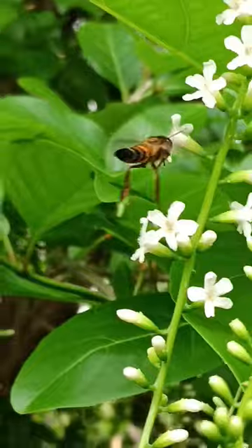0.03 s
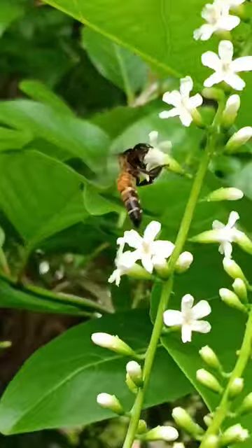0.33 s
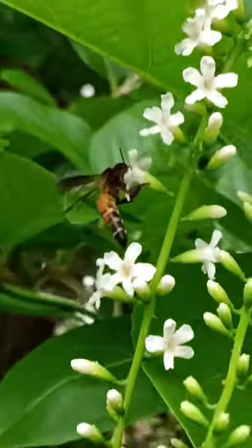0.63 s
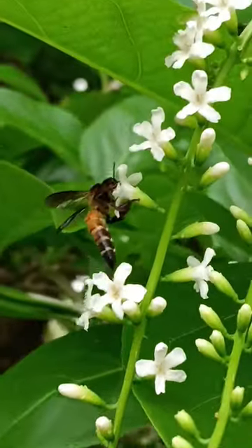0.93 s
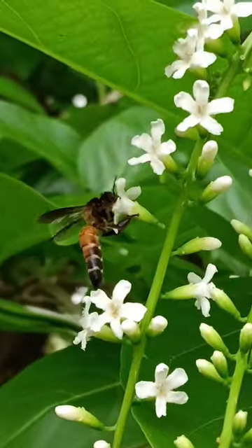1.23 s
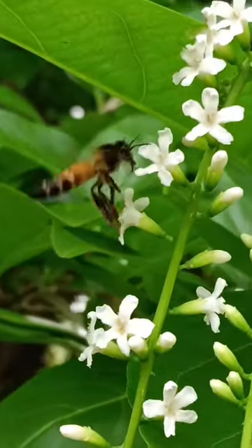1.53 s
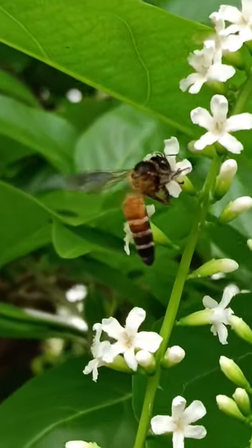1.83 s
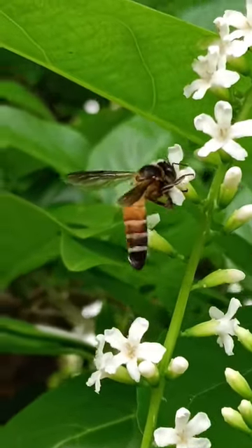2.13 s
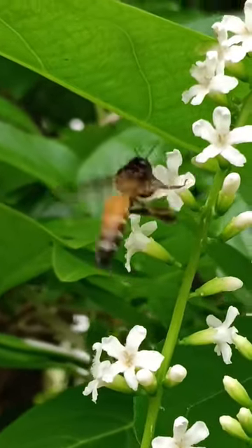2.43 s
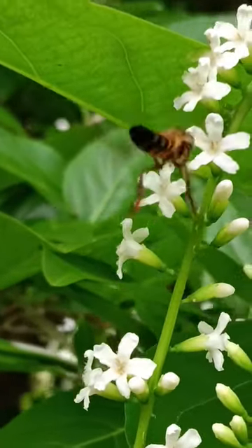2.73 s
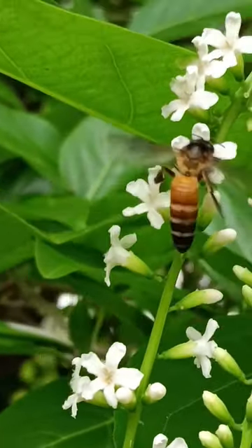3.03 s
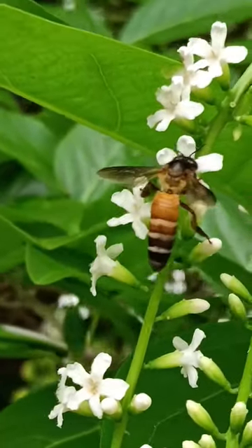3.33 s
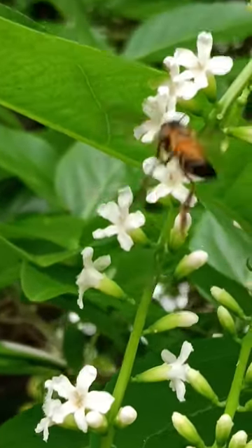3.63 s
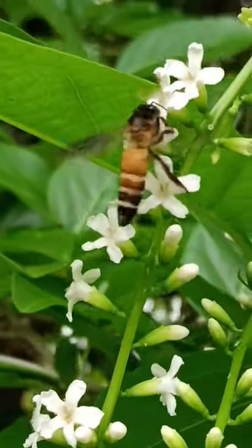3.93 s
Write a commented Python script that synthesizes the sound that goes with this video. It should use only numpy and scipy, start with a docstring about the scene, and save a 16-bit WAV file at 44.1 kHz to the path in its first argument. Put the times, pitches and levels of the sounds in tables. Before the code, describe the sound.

A low, steady rumble of far traffic and light hiss fill a garden. Two sharp clicks and small finger ticks sound close to the hand-held microphone, while a bee's faint hum comes and goes in the second half.

```python
"""Thin hiss opens out of a quarter second of near silence, with the low, steady rumble of far traffic
close behind: a garden. Faint, brief swells lift the background; fingers tick and rub on a hand-held camera.
Twice its case snaps sharply and rings, mostly at the left microphone.
A large bee flies between flowers, its wingbeats a faint hum that swells with each short flight."""
import sys
import numpy as np
from scipy import signal
from scipy.fft import rfft, irfft, next_fast_len
from scipy.io import wavfile
from scipy.ndimage import uniform_filter1d, map_coordinates

SR = 44100
rng = np.random.default_rng(int(sys.argv[2]) if len(sys.argv) > 2 else 0)


def generate_wav(sig):
    """Save sig (samples, or channels by samples) to the path in sys.argv[1] as 16-bit PCM at SR."""
    pcm = np.round(np.clip(np.atleast_2d(sig).T, -1, 1) * 32767).astype(np.int16)
    wavfile.write(sys.argv[1], SR, pcm)


N = 176400

# Fade-ins of the hiss and of everything else: time_s, gain_db
HISS_FADE_IN = [(.165, -53), (.195, -16), (.25, -8), (.3, -5.5)]
GARDEN_FADE_IN = [(.18, -60.5), (.243, -28), (.26, -8), (.31, -5)]
# Hiss colour at each microphone: freq_hz, relative_db
HISS_LEFT_EQ = [(500, -38), (1500, 2.5), (2300, -4.5), (4400, -1), (5000, -4), (5500, -2.5), (6550, -14.5),
                (7050, -6), (7400, 3.5), (7750, 1), (8200, -2.5), (9100, -8.5), (9400, -18.5), (10200, -10),
                (11500, -45), (15200, -42)]
HISS_RIGHT_EQ = [(500, 1.5), (1500, -9), (2400, -1), (4700, -3), (5400, -0.5), (6550, -12.5), (7300, -4),
                 (7750, 1.5), (8200, -11), (9000, -9.5), (9450, -23.5), (9950, 1), (10400, -2),
                 (11000, -8.5), (11500, -54.5), (15000, -25.5)]
# Fader ride of the traffic's roar: time_s, level_db
ROAR_RIDE = [(.3, -47), (.8, -46), (1.25, -47.5), (1.45, -45.5), (1.62, -47), (1.72, -45), (1.95, -46),
             (2.55, -47), (2.66, -47), (2.8, -50), (3.05, -49), (3.3, -48), (3.55, -48.5), (3.82, -46),
             (4, -47.5)]
# Colours of the traffic's roar and of the rumble under it: freq_hz, relative_db
ROAR_EQ = [(60, -20.5), (130, -21.5), (200, -2), (280, -1.5), (400, -4), (500, -4.5), (600, -9), (800, -9),
           (950, -9.5), (1080, -8), (1220, -10.5), (1310, -26.5), (1650, -22.5), (2100, -32.5),
           (3500, -45.5)]
RUMBLE_EQ = [(20, -31.5), (32, -35), (48, -10.5), (65, -9), (90, -2.5), (125, -1.5), (170, -8.5),
             (300, -16.5), (800, -79.5)]
# How alike the traffic is left and right: freq_hz, correlation
STEREO_LIKENESS = [(50, 0.59), (120, 0.635), (270, 0.74), (500, 0.62), (800, 0.372), (1200, 0.195),
                   (2000, 0.0015)]
# Faint, brief swells in the background noise: peak_s, sigma_s, level_db, centre_hz, width_hz
NOISE_SWELLS = [(0.328, 0.0093, -48, 770, 500), (0.617, 0.0135, -47.5, 1013, 500),
                (0.436, .005, -50, 800, 500), (0.889, 0.004, -42, 700, 587), (0.918, 0.009, -41.5, 100, 70),
                (0.939, 0.0142, -57, 1750, 500), (1.039, 0.026, -51.5, 120.5, 50),
                (1.062, 0.0383, -47.5, 1075, 286), (1.094, 0.094, -56, 1880, 650),
                (2.293, 0.0474, -49.5, 97, 50), (2.363, 0.0132, -60.5, 2550, 1200)]
# Finger ticks and rubs: start_s, level_db, rise_s, t60_s, ring_hz, ring_relative_db
FINGER_TOUCHES = [(.364, -59.5, 0.0068, 0.52, 3970, -3.5), (.621, -54.5, 0.00102, 0.036, 7850, 4),
                  (.692, -47.5, 0.00076, 0.0332, 10120, -10.5), (1.162, -47, .001, 0.061, 1880, 13),
                  (1.315, -48.5, .002, 0.179, 7254, 0), (1.53, -40.5, .0007, .06, 8900, -6),
                  (1.543, -41, 0.0022, 0.166, 4350, -7), (1.613, -34, 0.00205, 0.0306, 3040, 1),
                  (1.632, -47, 0.0021, 0.09, 3090, -14), (1.721, -51.5, .0017, 0.095, 5424, -8.5),
                  (1.77, -56, 0.0048, 0.136, 4250, -3), (3.097, -38, 0.00154, 0.0195, 2631, -4.5),
                  (3.2194, -41, 0.00094, 0.026, 5492, 0), (3.276, -50.5, 0.0024, 0.097, 7874, 4.5),
                  (3.325, -49.5, 0.00214, 0.066, 4713, 3), (3.543, -46.5, 0.00166, 0.073, 3400, -6)]
# Colour of the case under a finger: freq_hz, relative_db
SCRAPE_EQ = [(600, -9.5), (2000, -8), (3200, -9), (4300, -3.5), (4900, -9), (5600, -2.5), (6500, -20),
             (7500, 6), (8200, -5.5), (8900, -11), (9500, -19), (10200, -5.5), (11300, -30.5), (15000, -34)]
# Colours of the two loud clicks: freq_hz, relative_db
DULL = [(300, -41), (1100, -6), (1400, -16), (1750, -1), (2400, -10.5), (3400, 0), (4500, -7), (5400, -6),
        (6500, -27), (7350, -0.5), (7800, -8.5), (8300, -18.5), (9400, -37), (10150, -9), (11500, -41),
        (15000, -51.5)]
BRIGHT = [(300, -11), (1450, -23.5), (2150, -5), (2600, -10), (3000, -12.5), (3500, -15.5), (4150, -6.5),
          (4900, -13), (5750, -7.5), (6400, -24.5), (7000, -12), (7780, 2), (8200, -6.5), (8800, -1.5),
          (9600, -16.5), (10300, -11), (11200, -12), (15300, -10.5)]
# Loud clicks: start_s, level_db, snap_t60_s, tail_relative_db, tail_t60_s, ring_relative_db, colour
CASE_CLICKS = [(1.0703, -22.5, 0.0079, -16, 0.32, -16, DULL),
               (3.0546, -18, 0.033, -13.5, 0.163, -12, BRIGHT)]
# Ringing modes of the case: pitch_hz, relative_db, t60_s
CASE_MODES = [(1740.3, -6, 0.149), (2230, 7, 0.0234), (2595, -5, .16), (3372, -6.5, 0.29), (4196, 0, 0.059),
              (4620, -3, .42), (5785, -1.5, 0.081), (7484, -14.5, 0.408), (7920, 3.5, 0.061)]
# The bee's flights: peak_s, sigma_s, wingbeat_hz, fundamental_left_db, octave_db
BEE_FLIGHTS = [(1.702, 0.046, 120, -57, -50), (2.674, 0.054, 122.1, -59.5, -44.5),
               (2.917, 0.087, 128, -59, -46.5), (3.103, 0.099, 126, -52, -52.5),
               (3.725, 0.041, 121.7, -52, -59.5), (3.855, 0.093, 127.5, -62.5, -46),
               (3.974, 0.091, 124.8, -53, -61.5)]

TAIL_RIGHT_DB = -4  # the case's diffuse sound sits a little to the left


def amp(db):
    """Decibels to gain."""
    return 10 ** (np.asarray(db) / 20)


def unit(x):
    """Scale to rms 1."""
    return x / np.sqrt(np.mean(x ** 2) + 1e-20)


def along(points, hz):
    """Read a curve of (freq_hz, value) points on a log frequency axis."""
    freqs, values = np.transpose(points)
    return np.interp(np.log(hz + 1), np.log(freqs + 1), values)


def fader(points):
    """A gain curve through (time_s, gain_db) points."""
    return amp(np.interp(np.arange(N) / SR, *np.transpose(points)))


def swell(peak_s, sigma_s):
    """A bell-shaped rise and fall."""
    return np.exp(-.5 * ((np.arange(N) / SR - peak_s) / sigma_s) ** 2)


def strike(t, rise_s, t60_s):
    """A straight attack, then an exponential decay."""
    return np.minimum(t / rise_s, 1) * amp(-60 * np.maximum(t - rise_s, 0) / t60_s)


def wobble(rate_hz):
    """A smooth random curve with rate_hz knots a second."""
    knots = rng.standard_normal(int(N * rate_hz / SR) + 4)
    return map_coordinates(knots, [np.arange(N) * rate_hz / SR])


def grain(size, depth_db, span):
    """A rough, flickering gain, smoothed over span samples."""
    return amp(depth_db * unit(uniform_filter1d(rng.standard_normal(size), size=span)))


def filtered(x, response):
    """Pass x through a response given as a function of frequency."""
    size = x.shape[-1]
    padded = next_fast_len(size + 4096)
    return irfft(rfft(x, padded) * response(np.fft.rfftfreq(padded, 1 / SR)), padded)[..., :size]


def band(centre_hz, width_hz, size):
    """Stereo noise in one resonance, rms 1."""
    white = rng.standard_normal((2, size))
    return unit(filtered(white, lambda hz: 1 / (1 + (2 * (hz - centre_hz) / width_hz) ** 2)))


def patchy(depth_db):
    """Two unrelated noises with brief, narrow patches of random gain."""
    spectra = signal.stft(rng.standard_normal((2, N)), nperseg=1024)[2]
    patches = uniform_filter1d(rng.standard_normal(spectra.shape[1:]), size=4, axis=0)
    patches = uniform_filter1d(patches, size=4, axis=1)
    gain = amp(depth_db * 2 * np.tanh(unit(patches) / 2))
    return signal.istft(spectra * gain, nperseg=1024)[1][:, :N]


def right(db):
    """Channel gains that trim only the right side."""
    return amp([[0], [db]])


def across(x, right_db, lag_s=0.000507):
    """A sound at the left microphone reaches the right one later and weaker."""
    lags_s = np.array([[0], [lag_s]])
    return filtered(np.array([x, x]), lambda hz: np.exp(-2j * np.pi * hz * lags_s)) * right(right_db)


def add(out, start_s, x):
    """Mix x into out at start_s."""
    part = out[:, round(start_s * SR):][:, :x.shape[1]]
    part += x[:, :part.shape[1]]


def hiss(level_db=-61):
    """Thin, slightly restless hiss, coloured by each microphone's port."""
    ports = filtered(patchy(depth_db=4.5),
                     lambda hz: amp([along(HISS_LEFT_EQ, hz), along(HISS_RIGHT_EQ, hz)]))
    return amp(level_db + 1.34 * wobble(7.9)) * unit(ports)


def outdoor_bed(eq, patchy_db):
    """Outdoor noise of rms 1, fairly centred in the bass and wide in the treble."""
    def mid_side_eq(hz):
        spread = np.arccos(np.clip(along(STEREO_LIKENESS, hz), -1, 1)) / 2
        return amp(along(eq, hz)) * [np.cos(spread), np.sin(spread)]
    mid, side = filtered(patchy(patchy_db), mid_side_eq)
    return unit(np.array([mid + side, mid - side]))


def traffic(rumble_db=-53):
    """Far traffic: a dull, burbling roar over a deeper rumble that leans to the right."""
    roar = fader(ROAR_RIDE) * amp(0.472 * wobble(22.235)) * outdoor_bed(ROAR_EQ, patchy_db=3.5)
    rumble = amp(rumble_db + 1.75 * wobble(9.11)) * outdoor_bed(RUMBLE_EQ, patchy_db=1.5)
    return roar + rumble * right(db=5.0)


def background_swells():
    """The background noise lifts faintly and briefly, one band at a time."""
    return sum(amp(db) * swell(peak_s, sigma_s) * band(centre_hz, width_hz, N)
               for peak_s, sigma_s, db, centre_hz, width_hz in NOISE_SWELLS)


def contact_noise(eq, size, ripple_db=3.5, step_hz=190):
    """Coloured noise of rms 1 with fine resonances that change from contact to contact."""
    ripple = ripple_db * rng.standard_normal(SR // step_hz)
    white = rng.standard_normal((2, size))
    return unit(filtered(white, lambda hz: amp(along(eq, hz) + map_coordinates(ripple, [hz / step_hz]))))


def fingers(crack_db=2.5, crack_t60_s=0.0088, crisp_rise_s=0.00066):
    """Each touch scrapes the case: a grainy burst with one resonance and a faint tail."""
    out, t = np.zeros((2, N)), np.arange(SR // 3) / SR
    for start_s, db, rise_s, t60_s, ring_hz, ring_db in FINGER_TOUCHES:
        rub = contact_noise(SCRAPE_EQ, len(t))
        scrape = unit(rub + amp(ring_db) * band(ring_hz, width_hz=340, size=len(t)))
        tick = scrape[0] * strike(t, rise_s, t60_s) * grain(len(t), depth_db=0.81, span=90)
        crispness = np.exp(-rise_s / crisp_rise_s)  # only sudden touches open with a thin crack
        crack = crispness * amp(crack_db - 60 * t / crack_t60_s) * rng.standard_normal(len(t))
        tail = amp(-12.5) * scrape * strike(t, rise_s=0.0102, t60_s=0.217) * right(TAIL_RIGHT_DB)
        add(out, start_s, amp(db) * (across(tick + crack, right_db=-11.5) + tail))
    return out


def case_mode(hz, size, waver_hz=85):
    """One wavering mode of the case, rms 1, with its own phase at each microphone."""
    cycles = np.cumsum(hz + waver_hz * wobble(rate_hz=260)[:size]) / SR
    return unit(np.sin(2 * np.pi * (cycles + rng.random((2, 1)))))


def clicks(strain_db=-20.5):
    """The case strains briefly, snaps at the left microphone and rings; a diffuse tail reaches both."""
    out, t = np.zeros((2, N)), np.arange(SR // 2) / SR
    for start_s, db, snap_t60_s, tail_db, tail_t60_s, ring_db, colour in CASE_CLICKS:
        snap = contact_noise(colour, len(t))[0] * strike(t, 0.00084, snap_t60_s)
        roughness = grain(len(t), depth_db=2.2, span=160)
        tail = contact_noise(colour, len(t)) * strike(t, 0.0103, tail_t60_s) * roughness
        ring = sum(amp(mode_db + along(colour, hz)) * case_mode(hz, len(t)) * strike(t, 0.00211, t60_s)
                   for hz, mode_db, t60_s in CASE_MODES)
        diffuse = (amp(tail_db) * tail + amp(ring_db) * ring) * right(TAIL_RIGHT_DB)
        add(out, start_s, amp(db) * (across(snap, right_db=-12) + diffuse))
        strain = swell(start_s, sigma_s=0.00335) * contact_noise(colour, N)
        out += amp(db + strain_db) * strain * right(TAIL_RIGHT_DB)
    return out


def bee(pitch_waver=0.01648, flutter_db=1.7, buzz_db=-9):
    """Beating wings give a fluttering fundamental, leaning right, with its octave and a weaker buzz."""
    out = np.zeros((2, N))
    for peak_s, sigma_s, wingbeat_hz, fundamental_db, octave_db in BEE_FLIGHTS:
        phase = 2 * np.pi * np.cumsum(wingbeat_hz * (1 + pitch_waver * wobble(25))) / SR
        fundamental = amp(fundamental_db) * np.sin(phase) * right(db=8.5)
        buzz = np.sin(3 * phase) + np.sin(4 * phase)
        overtones = amp(octave_db) * (np.sin(2 * phase) + amp(buzz_db) * buzz)
        out += swell(peak_s, sigma_s) * amp(flutter_db * wobble(30)) * (fundamental + overtones)
    return out


def scene():
    """The hiss fades in first; the garden and the handling follow just behind."""
    garden = traffic() + bee() + clicks() + fingers() + background_swells()
    return fader(HISS_FADE_IN) * hiss() + fader(GARDEN_FADE_IN) * garden


def record(dry):
    """A brick-wall low-pass takes off the very top."""
    return filtered(dry, lambda hz: hz < 15600)


dry = scene()
out = record(dry)
generate_wav(out)
```